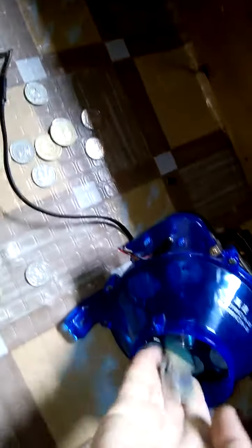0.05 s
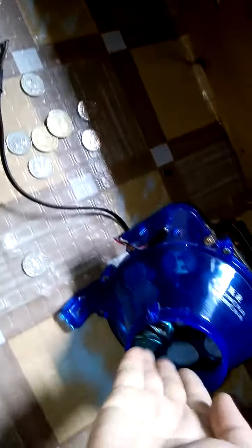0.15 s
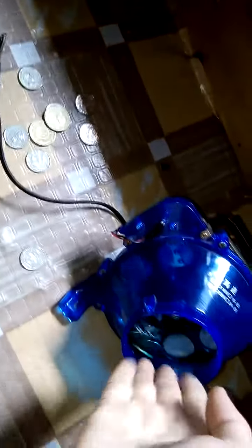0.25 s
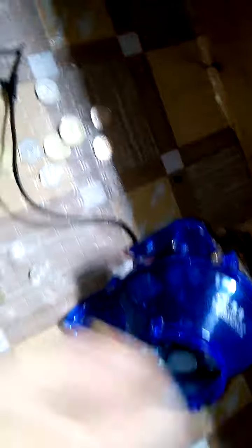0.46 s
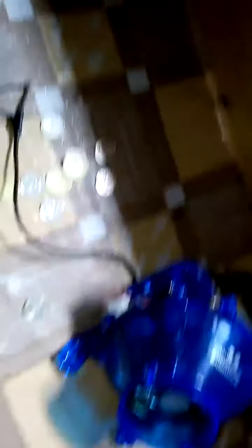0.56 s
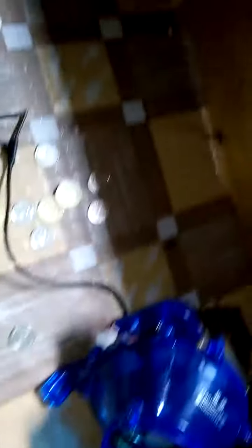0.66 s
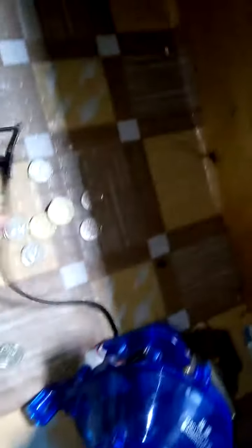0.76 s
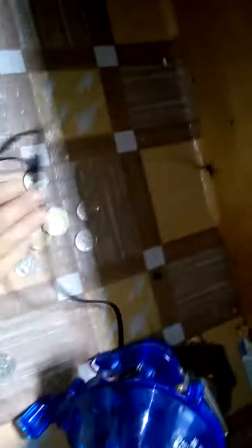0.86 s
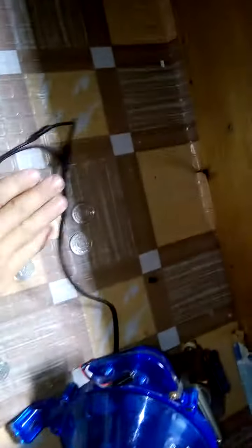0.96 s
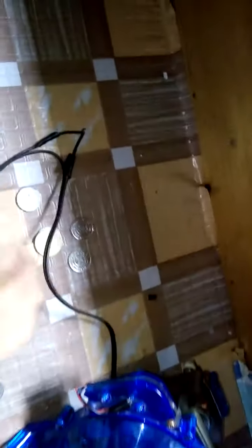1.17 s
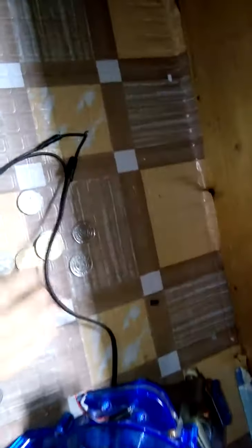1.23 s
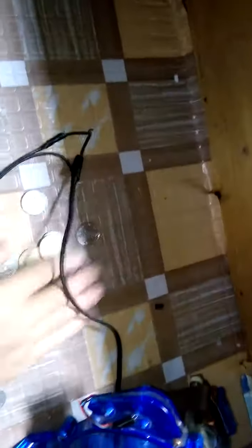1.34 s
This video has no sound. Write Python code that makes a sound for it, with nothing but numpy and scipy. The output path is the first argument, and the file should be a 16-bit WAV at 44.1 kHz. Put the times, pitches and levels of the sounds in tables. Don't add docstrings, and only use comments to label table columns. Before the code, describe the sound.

Metal coins clatter from a palm into a thin plastic hopper, then a hand brushes the table

```python
import sys
import numpy as np
from scipy import signal
from scipy.fft import rfft, irfft
from scipy.io import wavfile
from scipy.ndimage import uniform_filter1d

SR = 44100
rng = np.random.default_rng(int(sys.argv[2]) if len(sys.argv) > 2 else 0)


def decibels_to_gain(level_db):
    exponent = np.asarray(level_db, float) / 20
    return 10 ** exponent


def dump_mix(stems):
    frames = np.atleast_2d(stems).T
    limited = np.clip(frames, -1, 1)
    pcm = np.round(limited * 32767).astype(np.int16)
    wavfile.write(sys.argv[1], SR, pcm)


N = 61739

# time in seconds, rumble level in dB, deep share in dB.
GRIP = [(0.0, -52.5, -15), (.084, -60.5, -17), (.14, -43.5, 5), (.178, -57, 3), (.202, -41, -2.5),
        (.346, -53, -7), (.376, -36.5, -4), (.428, -50.5, 1), (.458, -39.5, -4), (.54, -53.5, -3),
        (.614, -56.5, -14), (.668, -54, -7), (.746, -65, -8), (.774, -52, -4), (.808, -49, -3),
        (.856, -63.5, -11), (1.1, -58.5, -15), (1.4, -52.5, -2.5)]
# frequency in Hz, level in dB.
RUMBLE_SPECTRUM = [(75, -8.5), (100, 1), (200, -5), (290, -12.5), (400, -34)]
# frequency in Hz, level in dB.
DEEP_SPECTRUM = [(15, -24), (40, -14), (70, 1), (85, -5)]
# frequency in Hz, level in dB.
HISS_SPECTRUM = [(250, -6), (800, -10.5), (2600, -9.5), (4800, -3.5), (6300, -9), (7600, -33), (9000, -40),
                 (15400, -39)]
# struck at in seconds, caught at in seconds, pitch in Hz.
COIN_RINGS = [(0, .028, 13076), (0, .02, 12700), (.041, .12, 13314), (.122, .25, 13076), (.124, .2, 12742),
              (.218, .24, 10250), (.228, .275, 12742), (.252, .3, 13314), (.281, .3, 13314),
              (.3, .316, 10800), (.317, .333, 13200), (.35, .5, 12742), (.51, .59, 13076),
              (.537, .625, 12742), (.123, .138, 13340), (.041, .052, 10800)]
COIN_RING_DB = [-56.5, -47.5, -40.5, -34, -41, -45, -28.5, -21, -14, -26.5, -22.5, -38.5, -42.5, -46, -34,
                -43]
# start in seconds, peak in dB, shell bass in dB, treble in dB.
PALM_KNOCKS = [ (.0055, -33, -31, 6.5), (0.0361, -26, -45, 8), (0.0393, -21.5, -27, 7),
               (0.0459, -27, -36.5, 19.5), (0.0692, -33.5, -19.5, 1.5), (0.1087, -36.5, -14.5, 14),
               (0.1193, -34.5, -32.5, 14.5), (.126, -35, -25, 14), (0.132, -32.5, -18.5, 10),
               (0.1615, -33, -38, 6), (0.1668, -28.5, -48, 12), (0.217, -48, -13, 21)]
# start in seconds, peak in dB, shell bass in dB, treble in dB,
# pitch favoured by the spot struck in Hz.
POUR_KNOCKS = [(0.2276, -12, 6, 5, 5300), (0.2422, -13, 6, 8, 4530), (0.2451, 0, 4.5, 0, 4590),
               (0.2497, -15, 4, -6.5, 4550), (0.2552, -7.5, 2.5, -6.5, 3390), (.2572, -1.5, -1, -7.5, 3410),
               (0.2765, -8, 0, -1.5, 4580), (0.2781, -2, 2, -1, 4650), (.281, -13, -4.5, 5, 3420),
               (.2855, -6.5, -1, 8, 5000), (0.2902, -11.5, 4.5, 0.5, 4630), (.2938, 1.5, 2, 4.5, 4560),
               (.299, -2, -4.5, -1, 5640), (.3015, -2, 3.5, 0, 4560), (.308, -5.5, 0, -1, 3800),
               (0.3107, 0.5, -4, 1, 3740), (0.3137, -7, -4, -0.5, 3880), (.3168, -1, -5, 6, 4720),
               (0.3198, 1, -6, -1, 5180), (0.3219, 2.5, -5.5, -1.5, 4620), (.327, -12.5, 2.5, 0, 3500),
               (0.331, -7, 2, 2, 5210), (0.3333, -3.5, -5.5, 0.5, 4480), (.338, -4.5, 0.5, 2, 4300),
               (0.3427, -4.5, -1, -1, 4340), (.347, -3, -2.5, -5, 4450), (.350, -9.5, 2, -1.5, 2940),
               (.3535, -11, -4, 1.5, 4780), (0.3587, -13.5, 4.5, 0, 4600), (0.3642, -3.5, -14, -9.5, 2860),
               (0.3668, -11.5, -10, -7, 4700), (.369, -13, -3, -5.5, 4640), (.377, -20.5, 9, 2, 4000),
               (0.382, -16, -6, 6.5, 3960), (.3935, -10.5, -12, -7, 4190), (.396, -16.5, -9, -8, 3364)]
# start in seconds, peak in dB, shell bass in dB, treble in dB, favoured pitch in Hz.
SETTLE_KNOCKS = [(.409, -26, -4, -0.5, 4330), (.4125, -19.5, -1, -2, 4330), (.4175, -17, -6, -4.5, 5100),
                 (.420, -22.5, -3, -3, 3100), (.4245, -24.5, 6, -4, 5000), (.439, -23.5, 4, 1, 5200),
                 (.4597, -15, -15, -11.5, 5195), (.4617, -10.5, -10, -13.5, 2900),
                 (.464, -18, -9, -14.5, 4820), (.478, -23, 1, -9, 2900), (.485, -21, 3, -13, 2960),
                 (.4885, -24.5, 10, -17, 5630), (.5088, -18, 10.5, -2, 5200), (.5108, -28, 15, -2.5, 1800),
                 (.526, -29.5, 7, 0.5, 5000), (.5285, -24.5, 5, -2, 2980), (.5352, -20.5, 5.5, -4, 4930),
                 (.5395, -22.5, 7.5, -3, 4810), (.543, -31, 7, -5, 4700), (.5772, -21.5, 10, 1.5, 5700),
                 (.587, -28.5, 1, -2.5, 4800), (.6060, -19.5, 11, -10.5, 4960), (.617, -28, 4, -5.5, 4930),
                 (.6372, -25, 1, -14, 1270), (.935, -40, -10, -27, 4530)]
# time in seconds, level in dB, treble in dB.
SLIDING = [(0, -47, -6.5), (.05, -51, 17.5), (.2, -72.5, 30.5), (.25, -31, -9), (.275, -29.5, 10),
           (.3, -13, 2.5), (.33, -21, -9.5), (.4, -34.5, 2.5), (.55, -39.5, -24.5), (.66, -45, -8),
           (.72, -85, -2)]
# frequency in Hz, level in dB.
SHELL_LOUDNESS = [(800, -37), (1000, -19.5), (2000, -17.5), (5400, 0), (8500, -26), (12000, -25),
                  (13300, -11.5), (15400, -30.5)]
# frequency in Hz, level in dB, time to fall 60 dB in seconds.
BOWL_MODES = [(712, -4, .06), (785, -5, .05), (835, -7, .05), (1355, -12, .025), (1793, -8.5, .025),
              (2180, -9, .025), (2630, -8, .025), (2930, -5, .024), (3440, 1, .026), (3830, -1, .028),
              (4377, -1, .03), (4620, 2, .024), (5100, -5, .03), (5700, -3, .025)]
# start in seconds, hold in seconds, level in dB.
BRUSH_STROKES = [
    (0.984, 0.084, -49),
    (1.078, 0.039, -50.5),
    (1.18, 0.023, -54),
    (1.321, 0.015, -52),
]
# frequency in Hz, level in dB.
BRUSH_SPECTRUM = [(150, 9.5), (300, -14), (560, -0.5), (900, -16.5), (3000, -16.5), (4800, 2.5),
                  (7000, -13), (9000, -36), (15300, -26)]


def rms_one(x):
    return x / np.sqrt(np.mean(x ** 2) + 1e-20)


def in_time(rows, index=1):
    rows = np.array(rows)
    return np.interp(np.arange(N) / SR, rows[:, 0], rows[:, index])


def at_hz(points, hz):
    points = np.array(points)
    return np.interp(np.log(hz), np.log(points[:, 0]), points[:, 1])


def drift(rate_hz):
    r = np.exp(-2 * np.pi * rate_hz / SR)
    noise = rng.standard_normal(2 * N)
    return rms_one(signal.lfilter([1], [1, -2 * r, r * r], noise)[N:])


def coloured(spectrum):
    hz = np.maximum(np.fft.rfftfreq(N, 1 / SR), 1)
    inside = (hz > spectrum[0][0]) & (hz < spectrum[-1][0])
    white = rfft(rng.standard_normal(N))
    return rms_one(irfft(white * decibels_to_gain(at_hz(spectrum, hz)) * inside, N))


def ring(clicks, hz, t60):
    r, w = decibels_to_gain(-60 / (t60 * SR)), 2 * np.pi * hz / SR
    return signal.lfilter([0, np.sin(w)], [1, -2 * r * np.cos(w), r * r], clicks + 1e-18)


def evened(x):
    return x / np.sqrt(uniform_filter1d(x ** 2, int(0.04 * SR)) + 0.046)


def handling():
    mid, deep = evened(coloured(RUMBLE_SPECTRUM)), evened(coloured(DEEP_SPECTRUM))
    press = decibels_to_gain(in_time(GRIP) - 1.5 + 1.9 * drift(45.18))
    return press * (mid + decibels_to_gain(in_time(GRIP, index=2) - 0.5) * deep)


def microphone_hiss():
    hiss_db, port_hz, port_t60_s, port_db = -50.5, 5000, 0.006, -8.5
    hiss = coloured(HISS_SPECTRUM)
    port = rms_one(ring(hiss, port_hz, port_t60_s))
    return decibels_to_gain(hiss_db + 0.5 * drift(10)) * (hiss + decibels_to_gain(port_db) * port)


def coins():
    rise_s, t60_s, catch_s = 0.003, 0.27, 0.0037
    pair_hz, tumble_db = 38, 4
    t, out = np.arange(N) / SR, np.zeros(N)
    phases = rng.random((len(COIN_RINGS), 2))
    for (struck, caught, hz), db, turn in zip(COIN_RINGS, COIN_RING_DB, phases):
        age = np.maximum(t - struck, 0)
        rise = 1 - np.exp(-age / rise_s)
        damping = np.exp(-np.maximum(t - caught, 0) / catch_s)
        shape = rise * decibels_to_gain(db - 60 * age / t60_s) * damping
        tone = np.sin(2 * np.pi * (hz * t + turn[0]))
        partner = 0.14 * np.sin(2 * np.pi * ((hz + pair_hz) * t + turn[1]))
        out += shape * decibels_to_gain(tumble_db * drift(66)) * (tone + partner)
    return out


def sliding_patter():
    clicks_per_s = 2000
    happens = rng.random(N) < clicks_per_s / SR * decibels_to_gain(4 * drift(40))
    strength = decibels_to_gain(4.36 * np.minimum(rng.exponential(size=N), 4))
    clicks = happens * strength * rng.choice([-1, 1], N)
    return rms_one(clicks) * decibels_to_gain(in_time(SLIDING) - 28.5)


def hopper():
    mode_count, shell_t60_s, t60_slope = 140, 0.02, 0.18
    touches, chatter_s, chatter_loss_db = 6, 0.0015, 4
    knock_db, mode_spread_db, boom_db, sliding_in_bowl_db = -24.5, 3, 3, -6.5
    palm_hz, favour_db, favour_octaves = 5500, 10, 0.051
    boom_below_hz, bass_below_hz, treble_above_hz, soft_above_hz, low_cut_hz = 900, 4600, 6300, 6900, 620

    palm = [(*row, palm_hz) for row in PALM_KNOCKS]
    s, db, bass_db, treble_db, spot_hz = np.transpose([*palm, *POUR_KNOCKS, *SETTLE_KNOCKS])
    crowd = (np.linspace(28, 124, mode_count) + rng.uniform(-0.35, 0.35, mode_count)) ** 2
    modes = [(hz, at_hz(SHELL_LOUDNESS, hz), shell_t60_s * (hz / 3000) ** t60_slope) for hz in crowd]
    modes = [*modes, *BOWL_MODES]

    first = np.arange(touches) == 0
    late = rng.random((len(s), touches)) * ~first
    when = ((s[:, None] + chatter_s * late) * SR).astype(int)
    signs = rng.choice([-1, 1], (len(s), len(modes), touches))
    spread = rng.standard_normal((len(s), len(modes)))
    patter = sliding_patter()
    bright_patter = patter * decibels_to_gain(in_time(SLIDING, index=2))

    body, treble = np.zeros(N), np.zeros(N)
    for k, (hz, mode_db, t60) in enumerate(modes):
        high = hz > treble_above_hz
        alternate = (-1) ** k
        clicks = (bright_patter if high else patter) * alternate
        if k >= mode_count:
            clicks = clicks * decibels_to_gain(sliding_in_bowl_db)
        if hz < boom_below_hz:
            strength_db = db + knock_db + boom_db + bass_db + 2 * spread[:, k]
            push = first * alternate
        else:
            low = np.clip(0.61 * np.log2(bass_below_hz / hz), 0, 1)
            tilt_db = low * np.maximum(bass_db, 0) + high * treble_db
            spot_db = favour_db * np.exp(-(np.log2(hz / spot_hz) / favour_octaves) ** 2)
            strength_db = db + knock_db + tilt_db + spot_db + mode_spread_db * spread[:, k]
            push = signs[:, k]
        np.add.at(clicks, when, decibels_to_gain(strength_db)[:, None] * push * decibels_to_gain(-chatter_loss_db * late))
        ringing = decibels_to_gain(mode_db) * ring(clicks, hz, t60)
        if high:
            treble += ringing
        else:
            body += ringing
    soften = signal.butter(4, soft_above_hz, fs=SR, output="sos")
    low_cut = signal.cheby2(8, 22, low_cut_hz, "high", fs=SR, output="sos")
    return signal.sosfilt(low_cut, signal.sosfilt(soften, body) + treble)


def room(x):
    t60_s, wall_cut_hz, first_echo_s = 0.44, 2360, 0.008
    t = np.arange(SR // 2) / SR
    tail = rng.standard_normal(len(t)) * decibels_to_gain(-60 * t / t60_s) * (t > first_echo_s)
    tail = signal.sosfilt(signal.butter(1, wall_cut_hz, fs=SR, output="sos"), tail)
    return signal.fftconvolve(x, tail / np.sqrt(np.sum(tail ** 2)))[:N]


def brush():
    rise_s, fall_s = 0.02, 0.032
    shape = np.zeros(N)
    for s, hold, db in BRUSH_STROKES:
        full = s + rise_s
        lift = full + hold
        shape += decibels_to_gain(db) * in_time([(s, 0), (full, 1), (lift, 1), (lift + fall_s, 0)])
    return shape * decibels_to_gain(1.6 * drift(95)) * coloured(BRUSH_SPECTRUM)


def scene():
    room_db = -21
    steady = handling() + microphone_hiss()
    near = coins() + hopper()
    return (near + decibels_to_gain(room_db) * room(near) + steady + brush())[None]


def top_cut(x):
    return signal.sosfilt(signal.butter(12, 15480, fs=SR, output="sos"), x)


def record(dry):
    limit, lopsided, cutoff_hz = 2.49, 0.11, 16500
    uneven = signal.sosfilt(signal.butter(2, 200, "high", fs=SR, output="sos"), dry ** 2)
    bent = limit * np.tanh((dry + lopsided * uneven) / limit)
    cut = signal.sosfilt(signal.cheby2(8, 40, cutoff_hz, fs=SR, output="sos"), bent)
    return top_cut(np.clip(cut, -1, 1))


dry = scene()
out = record(dry)
dump_mix(out)
```